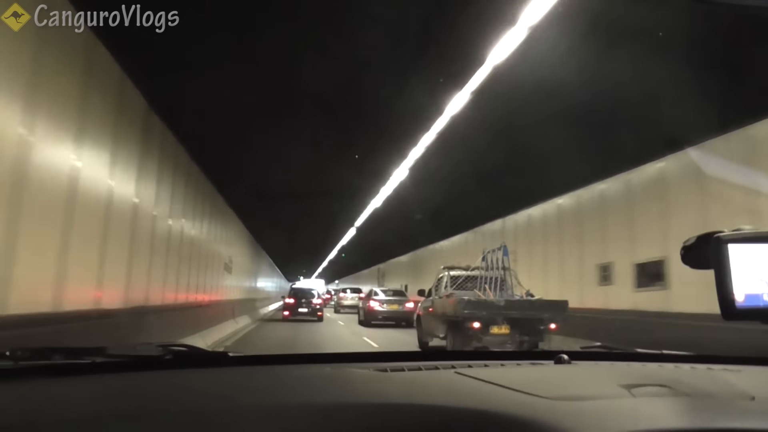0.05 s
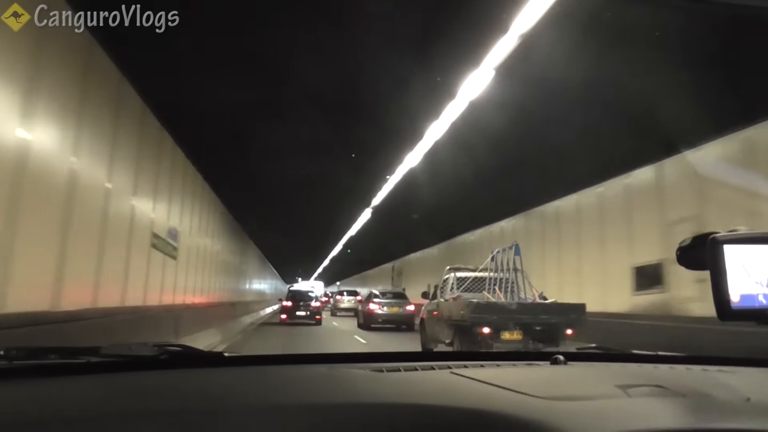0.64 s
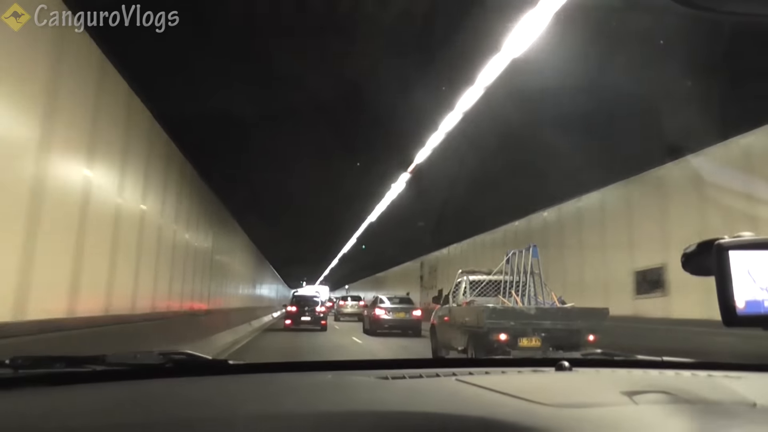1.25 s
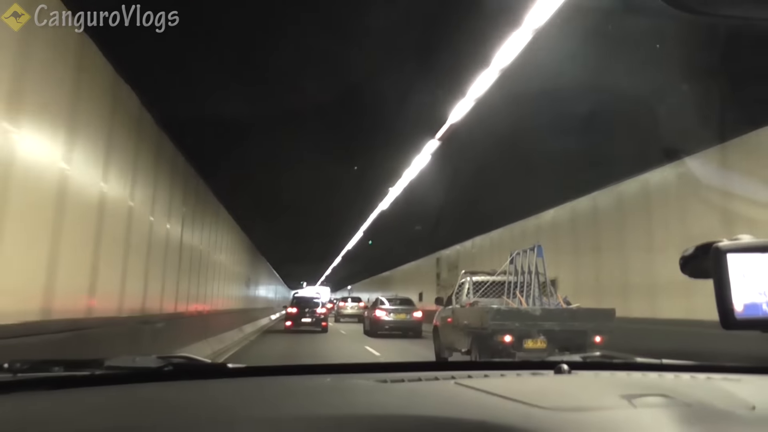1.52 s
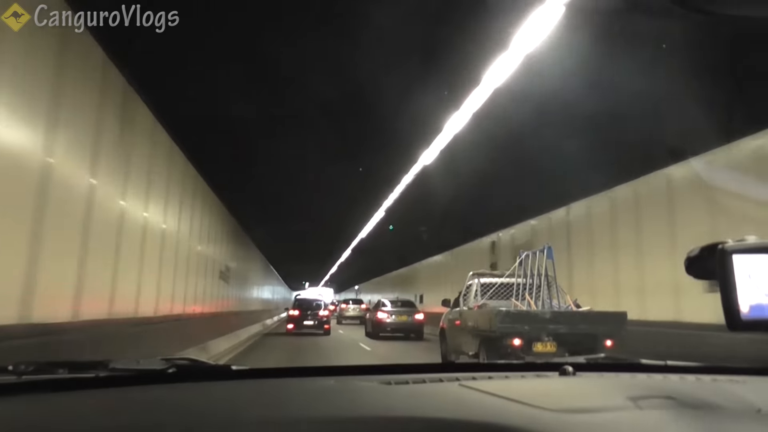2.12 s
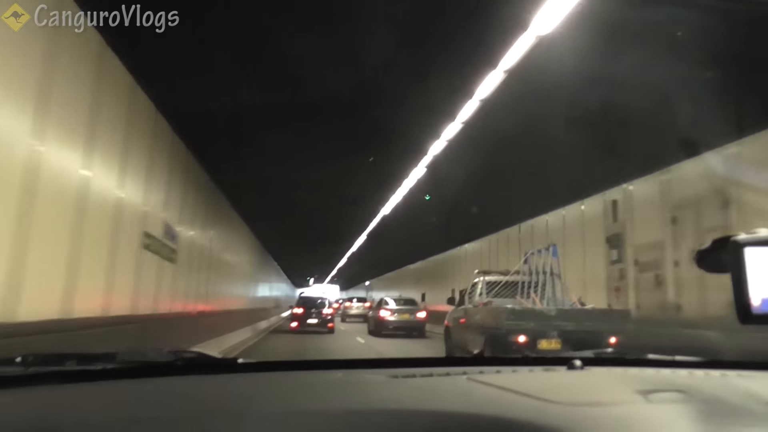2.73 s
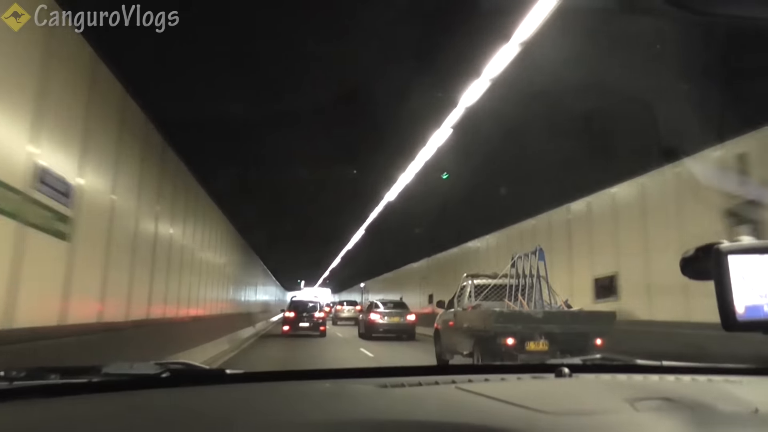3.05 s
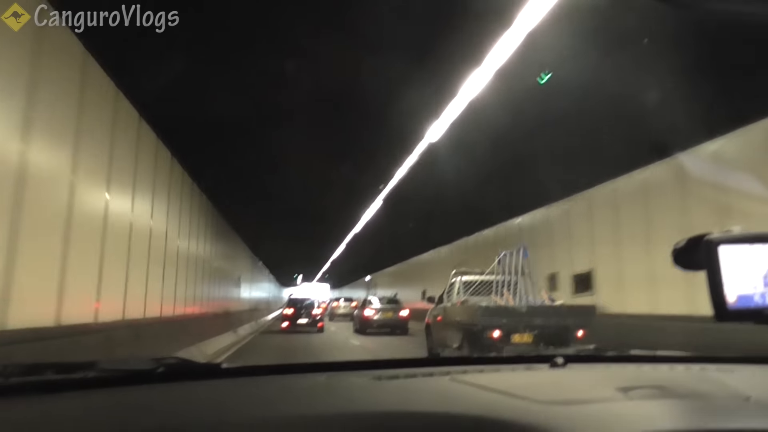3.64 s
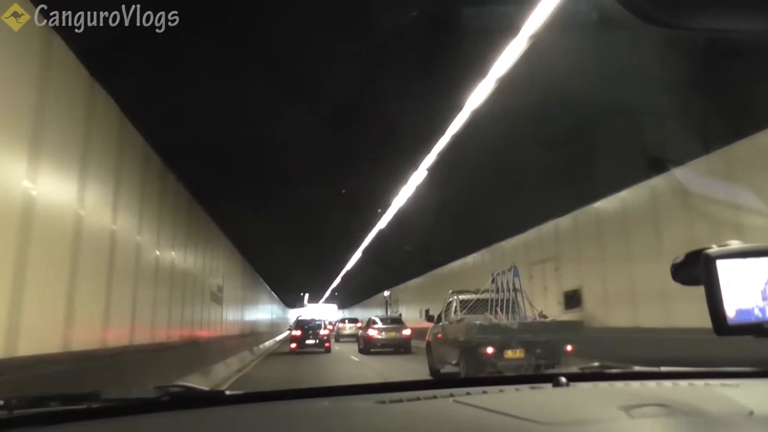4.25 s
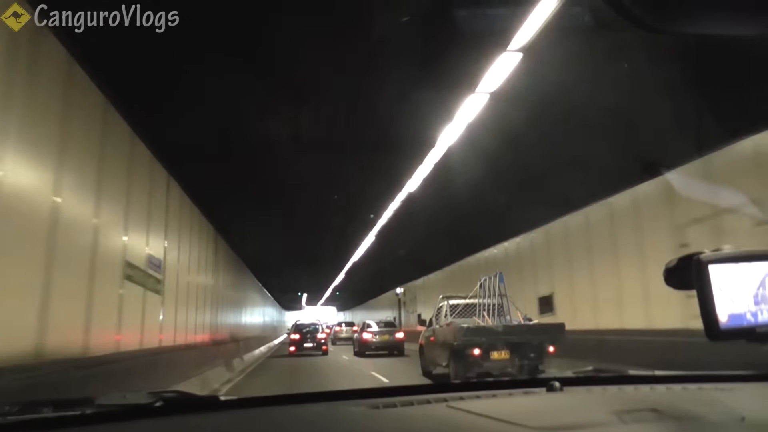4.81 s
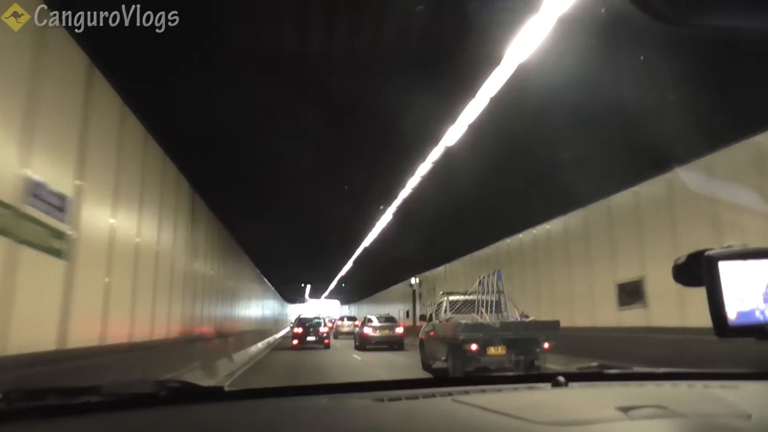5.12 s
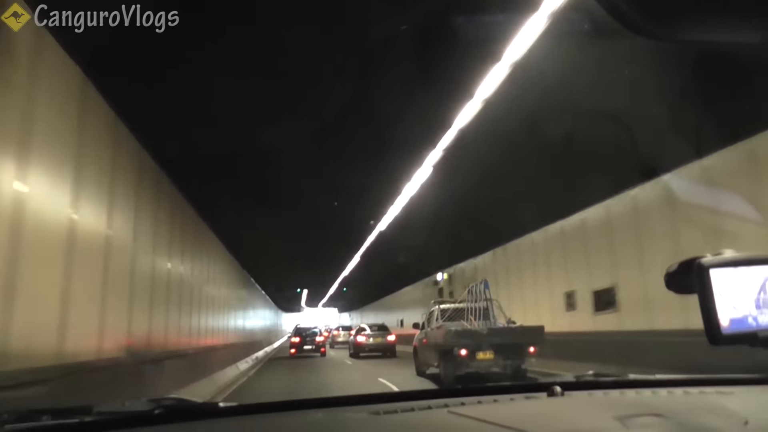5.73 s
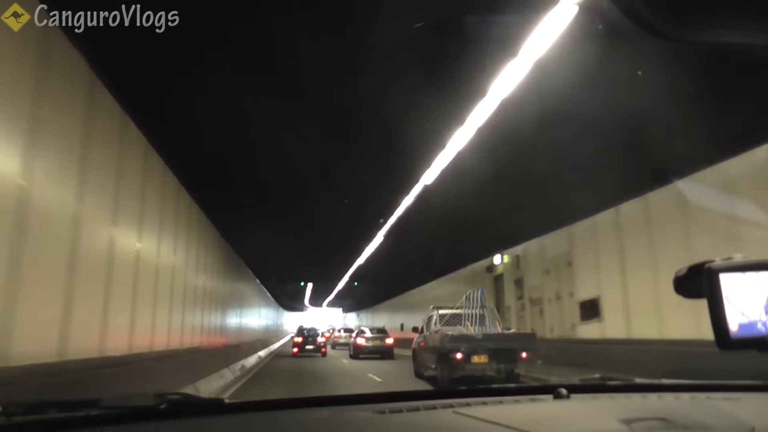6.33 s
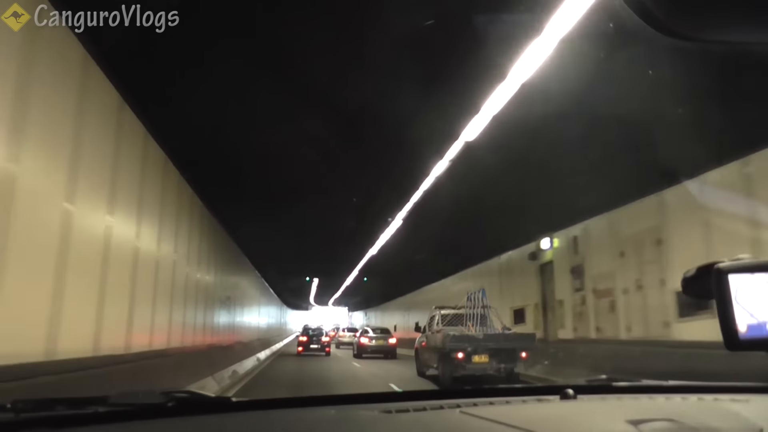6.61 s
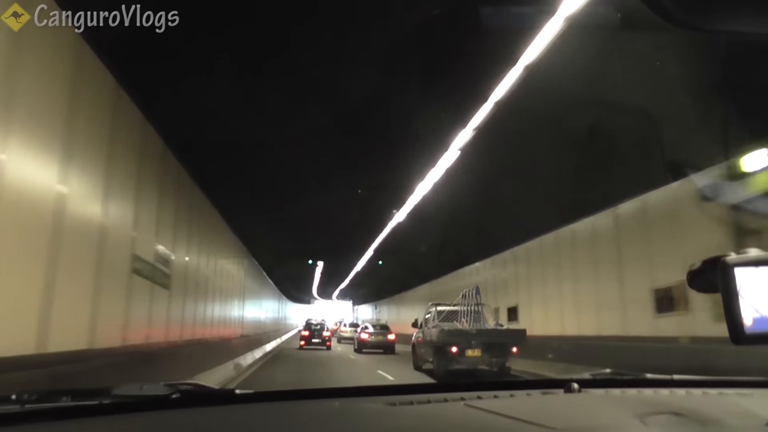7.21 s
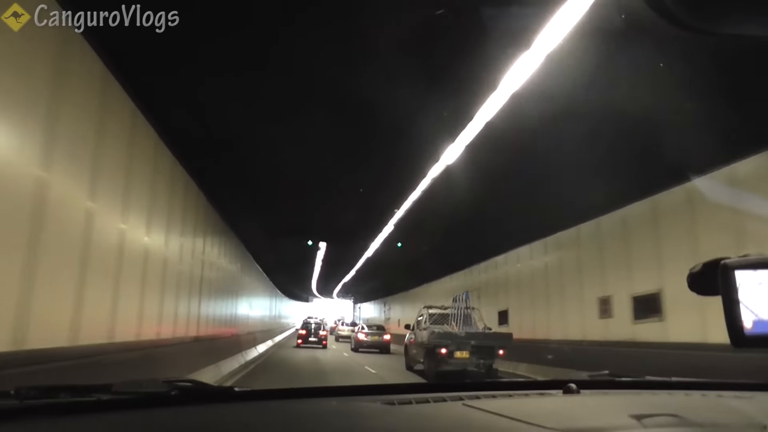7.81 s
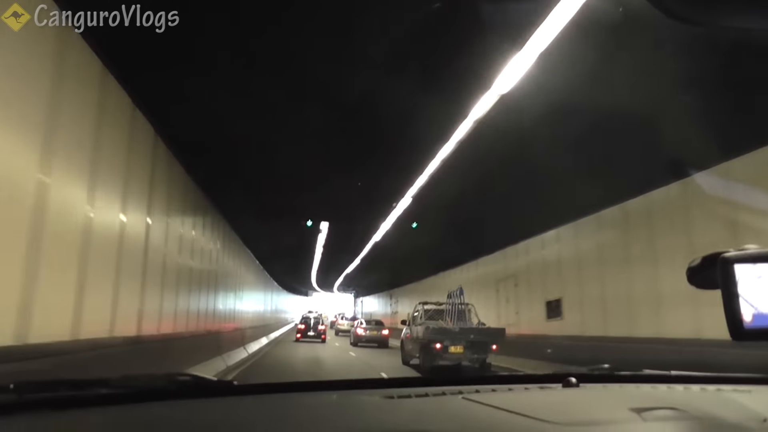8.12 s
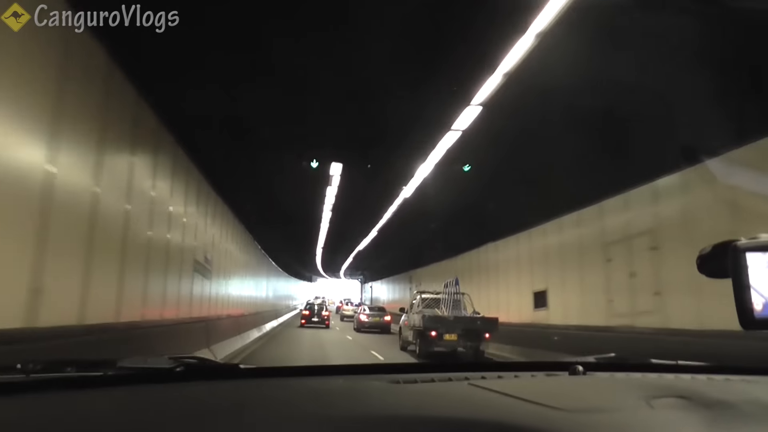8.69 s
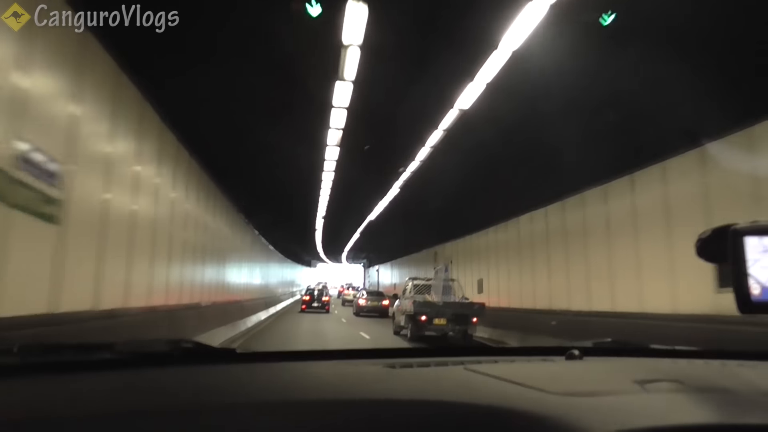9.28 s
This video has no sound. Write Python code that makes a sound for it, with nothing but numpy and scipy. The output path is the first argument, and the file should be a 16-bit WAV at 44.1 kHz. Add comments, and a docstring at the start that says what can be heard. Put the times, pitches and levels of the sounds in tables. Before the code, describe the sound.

A car cabin booms steadily with road noise as it travels through a tunnel in traffic. The tyres give a wavering, pulsing hum over a muffled roar from outside, and the road adds occasional soft bumps. The engine hums underneath, growing slightly stronger later on. The microphone is inside the car, where faint plastic ticks sound nearby in the first half and a light rub comes near the end.

```python
"""Driving through a road tunnel

Inside a car in traffic, rough asphalt shakes the cabin into a low boom, with a few soft thuds.
The air in the tyres rings and beats, and the tunnel roars dully through the glass.
The engine hums and pulls harder in the second half; close by, something brushes and ticks faintly."""
import sys
import numpy as np
from scipy import signal
from scipy.fft import rfft, irfft, next_fast_len
from scipy.io import wavfile

SR = 44100
rng = np.random.default_rng(int(sys.argv[2]) if len(sys.argv) > 2 else 0)


def waveform_to_disk(signal):
    """Save audio, clipped to [-1, 1], as 16-bit WAV at the path in sys.argv[1]."""
    frames = np.transpose(np.atleast_2d(signal))
    scaled = np.clip(frames, -1, 1) * 32767
    samples = np.round(scaled).astype(np.int16)
    wavfile.write(sys.argv[1], SR, samples)


N = 421138
T = np.arange(N) / SR
HZ = np.fft.rfftfreq(N, 1 / SR)


def amp(db):
    """Turns decibels into a factor to multiply by."""
    return 10 ** (np.asarray(db) / 20)


def unit(x):
    """Scales a signal to an average power of 1."""
    return x / np.sqrt(np.mean(x ** 2) + 1e-20)


def read(points, hz):
    """Looks up frequencies in a table, joining its points on a logarithmic frequency axis."""
    f, value = np.transpose(points)
    return np.interp(np.log(hz + 1), np.log(f + 1), value)


def follow(rows):
    """Turns a table of times and values into one curve per value column."""
    times, *columns = np.transpose(rows)
    return [np.interp(T, times, column) for column in columns]


def add(mix, start, sound):
    """Adds a sound to the mix at a start time in seconds."""
    part = mix[:, round(start * SR):][:, :sound.shape[-1]]
    part += sound[..., :part.shape[1]]


def drift(rate_hz):
    """A smooth random wobble, up to about the given rate."""
    hz = np.fft.rfftfreq(4096, 1 / 256)
    wander = irfft(rfft(rng.standard_normal(4096)) / np.sqrt(1 + (hz / rate_hz) ** 6))
    return unit(np.interp(T * 256, np.arange(len(wander)), wander))


def band(hz, centre_hz, octaves):
    """A bell-shaped filter that keeps the frequencies near its centre."""
    return np.exp(-.5 * (np.log2((hz + 1) / centre_hz) / octaves) ** 2)


def pulse(t, rise_s):
    """A level that swells to 1 at rise_s and then dies away."""
    return (t / rise_s) ** 2 * np.exp(2 * (1 - t / rise_s))


def cabin_noise(colour):
    """Stereo noise with the given spectrum: left and right are alike in the bass, less so higher up."""
    # how alike the two sides are: f/Hz, likeness (1 = the same)
    likeness = [(60, 0.96), (110, 1), (200, 0.94), (380, 0.97), (700, 0.9), (1290, 0.84), (2380, 0.64),
                (4400, 0.72), (8120, 0.66), (15000, 0.32)]
    # how much louder the left is: f/Hz, level/dB
    left_louder = [(60, 0.5), (110, 0.65), (200, 0.93), (380, -1.5), (700, -2.0), (1290, -0.19),
                   (2380, 1.0), (4400, 0.96), (8120, 0.5), (15000, 0.0)]
    # how far ahead the left is: f/Hz, phase/rad
    left_ahead = [(0, -0.058), (260, -0.18), (1800, 0.36), (2600, .1), (5000, -0.046)]
    size = next_fast_len(N, True)
    hz = np.fft.rfftfreq(size, 1 / SR)
    left, other = rfft(rng.standard_normal((2, size)))
    same = np.clip(read(likeness, hz), 0, 1)
    right = (same * left + np.sqrt(1 - same ** 2) * other) * np.exp(-1j * read(left_ahead, hz))
    lean = amp(read(left_louder, hz) / 2)
    spectra = np.array([left * lean, right / lean]) * np.interp(hz, HZ, colour)
    return unit(irfft(spectra, size)[:, :N])


def resonance(hz, width_hz):
    """Something that rings, shaken at random, gives an unsteady tone."""
    angle = 2 * np.pi * np.cumsum(hz * np.ones(N)) / SR
    return unit(drift(width_hz / 2) * np.cos(angle) + drift(width_hz / 2) * np.sin(angle))


def road(rumble_db=-23, boom_db=-27.5, lumps_db=0.5, deep_db=-23.0, deep_hz=70):
    """The grain of the asphalt shakes the car until it rumbles and booms, more on coarse stretches."""
    # spectrum of the rumble: f/Hz, level/dB
    spectrum = [(15, -39), (23, -26), (34, -12.5), (40, -12.5), (48, -9.5), (66, -13), (92, -7),
                (126, -3.5), (165, -1), (205, -8), (270, -8), (325, -10.5), (385, -8), (620, -19.5)]
    # rise and fall as the road surface changes: t/s, level/dB
    surface = [(0, -20), (1.3, -23), (2.6, -22.5), (3.3, -25), (4.4, -21.5), (5.2, -19.5), (6.1, -22.5),
               (7.3, -19.5), (8.2, -19.5), (9.55, -21)]
    # rise and fall of the deepest bass: t/s, level/dB
    deep_levels = [(0, 0), (.3, 1), (1.5, 1), (2.4, 0), (2.9, -2), (4.2, -3.5), (4.55, 1.5), (5.35, -1),
                   (5.7, 2.5), (6.9, 2.5), (8, -0.5), (8.95, -0.5), (9.35, 6)]
    # notes at which tyres and cabin boom: f/Hz, width/Hz, level/dB
    boom_notes = [(94.5, 5, -12), (113.3, 6.9, -11), (154.1, 8.2, -5), (223.6, 13, -20), (432.7, 18, -17.5),
                  (477.2, 25.7, -11)]
    (surface_db,), (heave_db,) = follow(surface), follow(deep_levels)
    swell_db = surface_db - surface_db.mean()
    colour = amp(read(spectrum, HZ)) / np.sqrt(1 + (HZ / 700) ** 8)
    deep_share = 1 / (1 + (HZ / deep_hz) ** 10)
    parts = colour * np.sqrt(deep_share), colour * np.sqrt(1 - deep_share)
    deep, rumble = (cabin_noise(part) * np.linalg.norm(part) / np.linalg.norm(colour) for part in parts)
    booms = sum(amp(db) * resonance(hz, width) for hz, width, db in boom_notes)
    body = amp(rumble_db + 0.2 * swell_db) * rumble + amp(boom_db + 0.98 * swell_db) * booms
    return amp(lumps_db * drift(7.1)) * (body + amp(deep_db + heave_db) * deep)


def tyres(ring_db=-4.0, second_db=-13, beat_hz=3.5, wander_hz=1.3, roughness=.38):
    """The air in two tyres rings at close, wavering pitches, so their sum throbs (beats)."""
    # strength of the ringing: t/s, level/dB
    levels = [(0, -25), (.3, -22), (.75, -24), (1.08, -21.5), (1.2, -35), (1.45, -29), (1.6, -25),
              (1.88, -23), (2.2, -22.5), (2.5, -21.5), (2.65, -18), (2.8, -28.5), (3.03, -36),
              (3.15, -22.5), (3.55, -27.5), (4.08, -22.5), (4.24, -31), (4.38, -20), (4.8, -32.5),
              (5.08, -18), (5.55, -20.5), (5.94, -17), (6.06, -31), (6.22, -24), (6.4, -21), (6.56, -33.5),
              (6.85, -25), (7.2, -18), (7.55, -24), (7.84, -35), (7.97, -18.5), (8.15, -26), (8.43, -32),
              (8.57, -13.5), (8.74, -23.5), (9.17, -17.5), (9.44, -18), (9.55, -25)]
    # pitch of the first tyre: t/s, f/Hz
    pitches = [(0, 175.5), (.6, 176.8), (1.1, 176.4), (1.9, 178), (2.6, 174.5), (3.9, 173.6), (4.4, 174.7),
               (5.3, 177.5), (5.8, 173.7), (6.35, 179.2), (7.05, 170.8), (7.45, 178), (8, 170.5),
               (8.6, 177.4), (9.1, 171.5), (9.55, 174.8)]
    (level_db,), (hz,) = follow(levels), follow(pitches)
    first, second = (np.sin(2 * np.pi * np.cumsum(pitch + wander_hz * drift(6.25)) / SR)
                     for pitch in (hz, hz - beat_hz))
    ring = unit(first + amp(second_db) * second)
    return amp(level_db + ring_db) * unit(ring + roughness * resonance(hz, width_hz=15))


def reflections(echo_db=-15, fade_s=0.13, count=60):
    """Echoes off the glass and dashboard make a filter with many small peaks and dips."""
    delay, sign = rng.uniform(.003, .05, count), rng.choice([-1, 1], count)
    echoes = np.bincount((delay * SR).astype(int), sign * amp(-60 * delay / fade_s), N)
    return abs(1 + amp(echo_db) * rfft(echoes) / np.linalg.norm(echoes))


def tunnel(roar_db=-31.5, swell_db=0.74, flutter_db=0.36):
    """Traffic roars steadily in the tunnel, muffled by the glass."""
    # spectrum of the roar: f/Hz, level/dB
    spectrum = [(150, -26), (450, -0.5), (620, -5.5), (730, 1), (880, -2.5), (1000, -5.5), (1350, -9.5),
                (1750, -17), (2200, -26.5), (2700, -33), (4000, -35.5)]
    glass = HZ / (HZ + 100) / np.sqrt(1 + (HZ / 4000) ** 6)  # shuts out treble and deep bass
    level = amp(roar_db + swell_db * drift(.6) + flutter_db * drift(14))
    return level * cabin_noise(amp(read(spectrum, HZ)) * glass * reflections())


def air_hiss(level_db=-57, flutter_db=0.43):
    """Air hisses past the door seals."""
    # spectrum of the hiss: f/Hz, level/dB
    spectrum = [(1500, -26), (2700, -6), (3500, 4), (5000, -3), (7000, -16.5), (8500, -21), (10800, -19.5),
                (12500, -20), (15500, -24.5)]
    # narrow peaks high in the hiss: f/Hz, width/Hz, lift/dB
    peaks = [(9300, 250, 6.5), (10720, 300, 5), (11350, 300, 2)]
    lift_db = sum(db / (1 + (2 * (HZ - hz) / width) ** 2) for hz, width, db in peaks)
    return amp(level_db + flutter_db * drift(8.8)) * cabin_noise(amp(read(spectrum, HZ) + lift_db))


def engine(level_db=-0.85, uneven_db=1.2, waver_hz=.35):
    """The engine's low, unsteady tones come through the cabin's front wall, louder as it works harder."""
    # coasting, then pulling: t/s, firing rate/Hz, load/dB
    running = [(0, 57.2, -36), (.5, 57, -30.5), (.75, 57, -37), (1.45, 56.9, -36.5), (1.8, 56.8, -28.5),
               (2.4, 56.4, -37), (2.75, 56, -28.5), (3.3, 55.8, -41.5), (3.55, 55.8, -27), (4.2, 55, -36),
               (4.55, 54.6, -44), (4.85, 54.2, -33.5), (5.35, 53.8, -43.5), (5.75, 53.9, -30.5),
               (6.25, 54.3, -30.5), (6.75, 54.9, -30), (7.45, 55.9, -26), (7.95, 56.35, -27),
               (8.3, 56.4, -32.5), (8.55, 56.6, -28.5), (9, 56.7, -26.5), (9.25, 56.9, -31),
               (9.55, 57.3, -26)]
    # the engine's tones: multiple of the firing rate
    multiples = [1, 1.5, 2, 3, 5]
    # strength of each tone: level/dB
    levels = [-8.5, -10.5, 0.5, -11.5, -8]
    # how much each tone follows the load: share (1 = fully)
    load_shares = [0.5, 0.89, 1, 0.57, .6]
    hz, load_db = follow(running)
    firings = np.cumsum(hz + waver_hz * drift(4)) / SR
    pull_db = load_db - load_db.mean()
    hum = np.zeros(N)
    for multiple, db, share in zip(multiples, levels, load_shares):
        level = amp(db + share * pull_db + uneven_db * drift(5.3))
        hum += level * unit(np.sin(2 * np.pi * (multiple * firings + rng.random())))
    return amp(load_db.mean() + level_db) * hum


def friction(moves, spectrum, level_db, grain_db, roundness, fade_db=20):
    """Sliding surfaces make a grainy hiss; each move gains fade_db as it rises, loses it as it falls."""
    power = np.zeros(N)
    for peak_s, db, rise, fall in moves:
        from_peak = np.maximum((peak_s - T) / rise, (T - peak_s) / fall)
        power += amp(db - fade_db * np.minimum(from_peak, 10) ** roundness) ** 2
    grain = amp(level_db + grain_db * drift(100))
    return np.sqrt(power) * grain * cabin_noise(amp(read(spectrum, HZ)))


def rubs():
    """Surfaces rub firmly together with a broad hiss."""
    # the rubs: peak t/s, level/dB, rise/s, fall/s
    moves = [(.12, -68.5, .4, 0.16), (.66, -68, .14, .16), (1.17, -74, .3, .3), (2.68, -65, 0.13, .15),
             (3.34, -61.5, 0.1, .16), (3.455, -56, 0.16, .15), (3.585, -59.5, .1, .13),
             (3.68, -62.5, .08, .09), (7.0, -71.5, .15, .15), (9.153, -52.5, 0.057, 0.058),
             (9.25, -51, 0.072, 0.043)]
    # their spectrum: f/Hz, level/dB
    spectrum = [(1000, -11.5), (3500, 3.5), (6500, 1), (10000, -3), (13000, -6), (15500, -15)]
    return friction(moves, spectrum, level_db=2.7, grain_db=2.2, roundness=1.8)


def roar_surges(level_db=-1):
    """The roar swells briefly around 400 Hz."""
    # the surges: peak t/s, level/dB, half length/s
    surges = [(0.095, -38, 0.031), (0.253, -26, 0.036), (.57, -34.5, 0.044), (0.73, -31, 0.045),
              (1.14, -33, 0.046), (1.494, -25, .04), (1.929, -33, 0.055), (2.112, -25.5, .04),
              (5.547, -29, .05), (6.45, -27, .04), (7.47, -30, 0.044)]
    swell = sum(amp(db) * np.exp(-((T - peak_s) / half) ** 2) for peak_s, db, half in surges)
    return amp(level_db) * swell * cabin_noise(band(HZ, centre_hz=410, octaves=0.36))


def thuds_and_swells():
    """Short low thuds from the road, and slower swells in the rumble."""
    # thuds (quick rise) and swells (slow rise): t/s, level/dB, f/Hz, rise/s
    low_pulses = [(0.145, -11, 153, 0.0066), (.24, -27, 80, .07), (.51, -21.5, 90.6, 0.051),
                  (1.3, -27.5, 90, 0.076), (2.2, -19.5, 142.5, .05), (2.629, -13.5, 151, 0.0082),
                  (2.66, -30, 93, 0.055), (2.78, -16.5, 149, 0.049), (3.53, -27, 96.2, 0.079),
                  (4.25, -24, 219.3, 0.055), (4.84, -21, 150.3, 0.05), (8.137, -10, 145, 0.0075),
                  (8.57, -16, 151, 0.0076), (9.36, -14.5, 140, 0.0074)]
    out, t = np.zeros((2, N)), np.arange(SR // 2) / SR
    for start, db, hz, rise in low_pulses:
        add(out, start, amp(db) * pulse(t, rise) * np.sin(2 * np.pi * (hz * t + rng.random())))
    return out


def brush_strokes():
    """Light strokes give a thin hiss; most build up until they catch."""
    # the strokes: peak t/s, level/dB, rise/s, fall/s
    moves = [(1.757, -50, .06, .009), (2.33, -63, .1, .07), (2.417, -61, .04, .02), (2.55, -66, 0.083, .1),
             (3.81, -67, .1, .08), (4.075, -64, .13, .02), (4.355, -58, .055, .014)]
    # their spectrum: f/Hz, level/dB
    spectrum = [(2000, -23), (5000, -12), (7000, -8), (9300, -1), (10200, -2.5), (11200, 0), (12300, -12),
                (15500, -12)]
    return friction(moves, spectrum, level_db=-1.0, grain_db=3.0, roundness=1.05)


def ticks(ring_db=-7, rise_s=.0006):
    """Plastic catches and lets go: each tick is a dry crack with a brief ring."""
    # the ticks: t/s, level/dB, centre f/Hz, spread/octaves, time to fade by 60 dB/s
    catches = [(1.7552, -38, 10800, .33, .028), (1.7620, -31, 7000, 1.1, .007),
               (1.7619, -27, 1800, .35, .009), (2.337, -50, 10000, .2, .025),
               (2.419, -46, 11000, .25, .018), (2.7246, -37.5, 5400, .7, .017),
               (2.7346, -48, 7000, .4, .012), (2.7464, -39.5, 5800, .7, .014),
               (2.767, -37.5, 3700, .95, .012), (3.313, -47, 6500, .6, .025),
               (3.7654, -41.5, 6000, .8, .011), (3.817, -52, 11000, .6, .011),
               (4.080, -39.5, 6200, 1.0, .009), (4.3622, -39, 5500, .8, .009)]
    # notes the plastic rings with: f/Hz, level/dB, time to fade by 60 dB/s
    plastic_notes = [(2100, -12, .025), (3580, -3, .02), (4300, -14, .012), (5250, -3, .025),
                     (5780, -7, .022), (7700, -12, .018), (11150, -10, .018)]
    out, t = np.zeros((2, N)), np.arange(2048) / SR
    hz = np.fft.rfftfreq(len(t), 1 / SR)
    for start, db, centre, spread, fade_s in catches:
        shared, *sides = rng.standard_normal((3, len(t)))
        colour = band(hz, centre, spread)
        crack = unit(irfft(rfft(shared + 1.3 * np.array(sides)) * colour)) * amp(-60 * t / fade_s)
        ring = np.zeros(len(t))
        for f, note_db, ring_s in plastic_notes:
            level = np.interp(f, hz, colour) * amp(note_db + ring_db - 60 * t / ring_s)
            ring += level * np.sin(2 * np.pi * f * t)
        add(out, start, amp(db) * np.minimum(t / rise_s, 1) * (crack + ring))
    return out


def squeaks(rise_s=0.0034):
    """The cabin's trim gives short, high squeaks."""
    # the squeaks: t/s, level/dB, f/Hz
    notes = [(3.778, -45, 2240), (7.664, -38.5, 2310)]
    out, t = np.zeros((2, N)), np.arange(2048) / SR
    for start, db, hz in notes:
        add(out, start, amp(db) * pulse(t, rise_s) * np.sin(2 * np.pi * hz * t))
    return out


def slide():
    """One long, soft slide makes a narrow, high hiss."""
    # the slide: peak t/s, level/dB, rise/s, fall/s
    moves = [(5.78, -66.5, .6, .3)]
    # its spectrum: f/Hz, level/dB
    spectrum = [(4000, -11.5), (7300, -3), (9000, -3), (10100, 2), (11000, -4.5), (12500, -13),
                (15500, -19)]
    return friction(moves, spectrum, level_db=-2.0, grain_db=2.5, roundness=1.7)


def scene():
    """Mixes the noise of driving with the small sounds close by."""
    brushing = brush_strokes() + rubs() + slide()
    driving = road() + roar_surges() + thuds_and_swells() + tyres() + tunnel() + air_hiss() + engine()
    return driving + brushing + ticks() + squeaks()


def record(dry, cutoff_hz=15720):
    """Cuts away the very highest treble."""
    lowpass = signal.firwin(511, cutoff_hz, window=("kaiser", 9), fs=SR)
    return signal.oaconvolve(dry, lowpass[None], "same")


dry = scene()
out = record(dry)
waveform_to_disk(out)
```